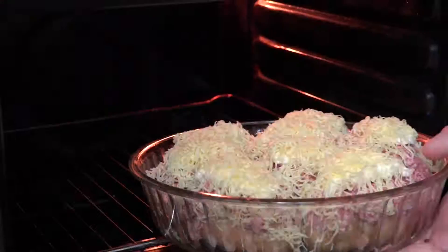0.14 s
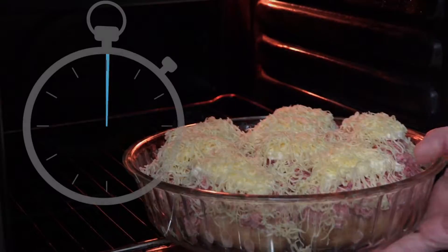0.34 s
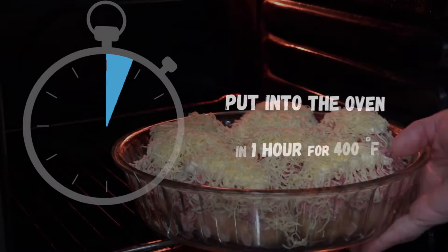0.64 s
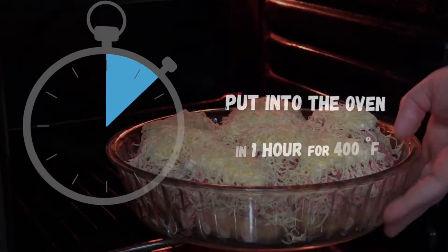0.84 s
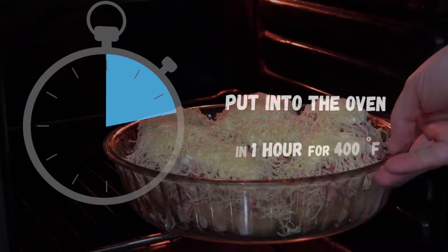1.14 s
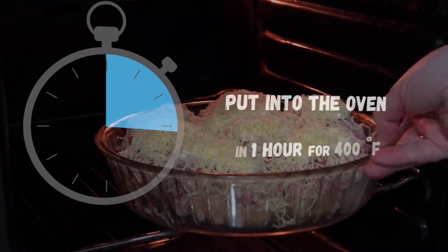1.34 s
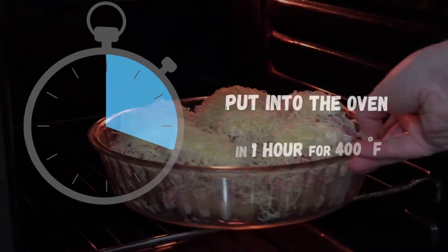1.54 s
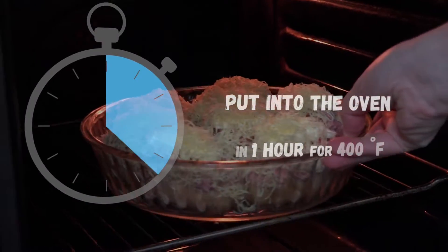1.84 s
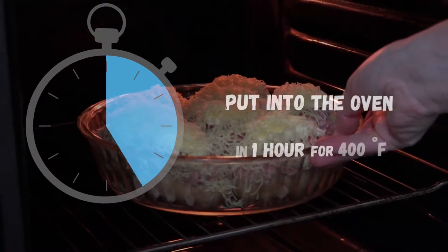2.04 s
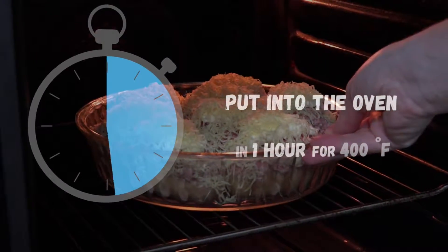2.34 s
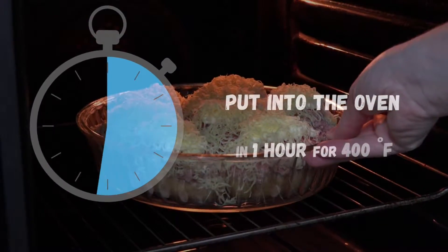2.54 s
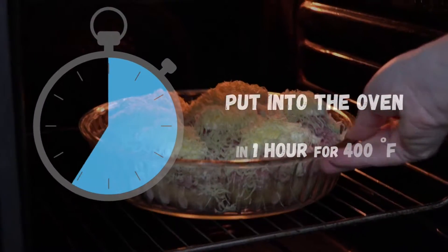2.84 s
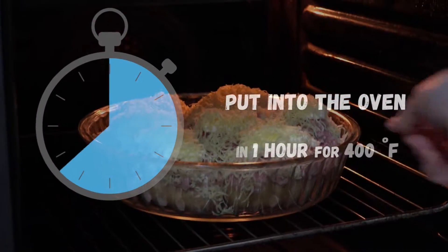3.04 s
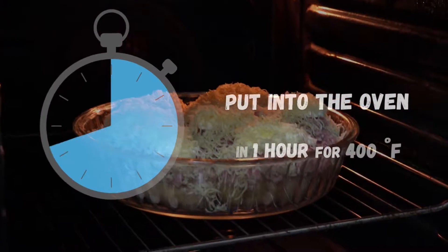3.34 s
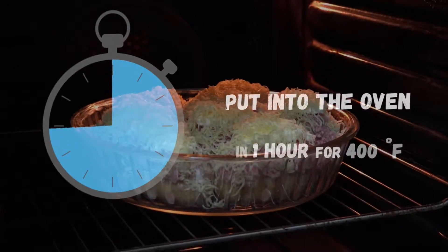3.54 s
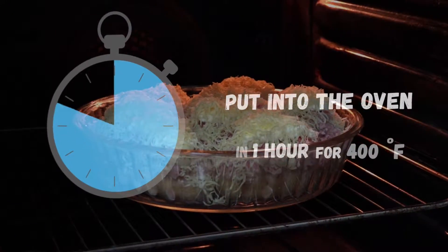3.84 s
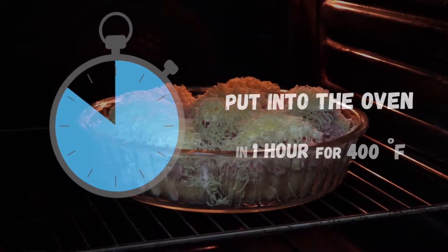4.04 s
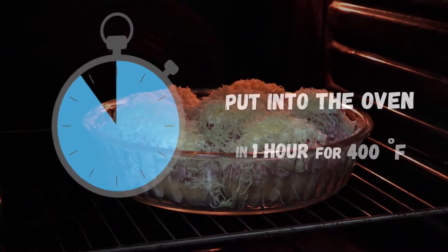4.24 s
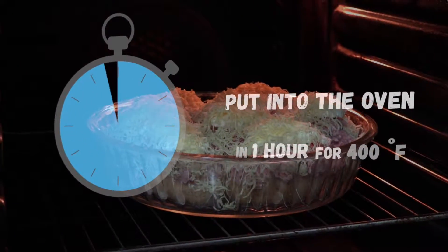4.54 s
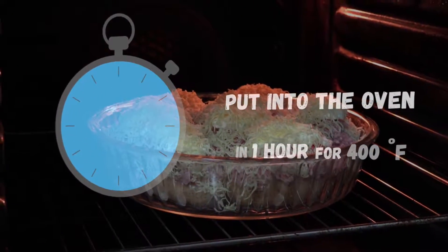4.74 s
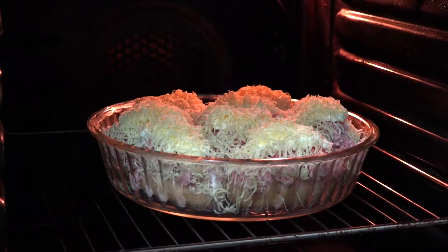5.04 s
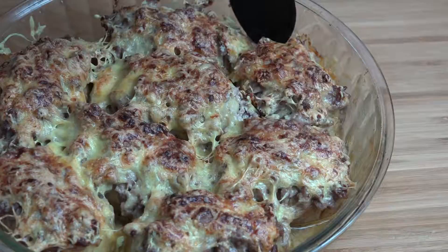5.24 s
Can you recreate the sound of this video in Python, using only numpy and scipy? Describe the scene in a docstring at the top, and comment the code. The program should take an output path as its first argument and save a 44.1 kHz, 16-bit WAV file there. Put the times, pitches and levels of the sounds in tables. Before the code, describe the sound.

Close to an open electric oven in a kitchen, a strong low hum runs with a rushing fan and a thin metallic buzz. A glass dish scrapes over the wire rack in three strokes, catching with brief rough squeaks. Once it settles, the rack gives a few small ticks. The hum grows slightly louder, and air from the door adds a deep rumble on the microphone.

```python
"""Glass dish into a running oven

An open electric oven, close up: its iron core hums strongly, a fan blows through the steel cavity,
loose sheet metal buzzes thinly and air from the door rocks the microphone. A glass dish scrapes
over the wire rack in three strokes and is let go; the rack ticks. The sound cuts in and out abruptly."""
import sys
import numpy as np
from scipy import signal
from scipy.fft import rfft, irfft, next_fast_len
from scipy.io import wavfile
from scipy.ndimage import uniform_filter1d, map_coordinates

SR = 44100
rng = np.random.default_rng(int(sys.argv[2]) if len(sys.argv) > 2 else 0)


def output_pcm(signal):
    """Save a mono or channel-first signal as 16-bit PCM at the path in sys.argv[1].

    Samples are clipped to [-1, 1] before scaling.
    """
    pcm = np.clip(np.atleast_2d(signal).T, -1, 1) * 32767
    wavfile.write(sys.argv[1], SR, np.round(pcm).astype(np.int16))


N = 237376
T = np.arange(N) / SR
MAINS_HZ = 50.0

# core hum, partials 1 to 3: t/s, level/dB
HUM_FIRST = [(0.25, -22.5), (0.68, -21), (1.12, -17.5), (1.97, -18.5), (2.88, -14.5), (3.41, -16.5),
             (4.91, -14.5), (5.2, -13.5)]
HUM_SECOND = [(.25, -32), (.7, -31), (1.5, -29.5), (1.85, -38.5), (2.2, -33.5), (4.5, -34), (5.1, -31.5)]
HUM_THIRD = [(.25, -36.5), (1.1, -33), (2.3, -43), (2.65, -35), (3.15, -41), (3.95, -42.5), (4.45, -31),
             (4.73, -41.5), (5.05, -32.5)]
# shaft tones: multiple of shaft rate, level/dB, unsteady share, flutter rate/Hz
SHAFT_TONES = [(5, -41, 0, 5.1), (6, -39, 0.48, 2.9), (7, -40.5, 0.2, 4.8), (9, -51, 0, 2.1),
               (10, -46.5, 1, 6.6), (16, -47.5, 0.1, 4.2), (17, -43.5, 0.8, 5.3), (18, -42, 1, 6),
               (24, -32.5, 0.54, 9), (30, -33.5, 1, 16)]
# dip in the shaft tones: t/s, half length/s, gain/dB
SHAFT_DIP = [(3.5, 0.29, -2.5)]

def motor(third_trim_db=-1, waver_db=1.5, drift_rad=0.079):
    """The iron core hums at twice the mains rate; the shaft, at half of it, adds fluttering tones."""
    shaft_phase = np.pi * MAINS_HZ * T
    core_phase = 4 * shaft_phase + drift_rad * wobble(0.74)
    partials_db = (curves(HUM_FIRST)[0],
                   curves(HUM_SECOND)[0] + waver_db * wobble(2.8),
                   curves(HUM_THIRD)[0] + third_trim_db)
    out = sum(amp(db) * np.sin(k * core_phase + 2 * np.pi * rng.random())
              for k, db in enumerate(partials_db, 1))
    dip_db = surges(SHAFT_DIP)
    for multiple, db, unsteady, flutter_hz in SHAFT_TONES:
        flutter = unit(wobble(flutter_hz) + 1j * wobble(flutter_hz))
        swing = np.sqrt(1 - unsteady ** 2) + unsteady * flutter
        tone = np.exp(1j * (multiple * shaft_phase + 2 * np.pi * rng.random()))
        out += amp(db + dip_db) * np.real(swing * tone)
    return np.sqrt(2) * out


# push, shove, settle, finger brush: start/s, peak/s, end/s, level/dB, rise/(dB/s), fall/(dB/s)
DISH_STROKES = [(.17, .4, 0.95, -25.5, 31, 17.5), (1.19, 1.635, 1.91, -20, 38.5, 64),
                (1.86, 1.92, 2.42, -23.5, 49, 42.5), (3.11, 3.35, 3.44, -52.5, 23, 128)]
# friction spectra: f/Hz, relative level/dB
PUSH_SPECTRUM = [(700, -15), (1300, 1.5), (1650, -8), (2500, -2.5), (3300, -6), (4400, -9.5), (5200, -11),
                 (6500, -11.5), (7200, -16.5), (8800, -14), (10200, -25.5), (14000, -28), (15800, -38.5)]
SHOVE_SPECTRUM = [(710, -29), (1200, 0.5), (1320, -6.5), (1890, -5.5), (2290, -5.5), (4620, -11),
                  (5990, -12.5), (8920, -16), (10700, -27), (14000, -26), (15800, -38)]
SETTLE_SPECTRUM = [(700, -12.5), (1350, 5.5), (1750, -8), (2900, 0), (5000, -0.5), (6500, -2.5),
                   (9200, -2.5), (10200, -11.5), (13500, -13), (15800, -22)]
BRUSH_SPECTRUM = [(1500, -23), (5000, -8.5), (9000, -2), (11000, -9.5), (15500, -9.5)]
# dish and rack modes: f/Hz, width/Hz, relative level/dB
PUSH_MODES = [(1310, 50, 5), (2555, 230, -6.5), (3020, 73, 6), (3870, 48, -25), (4470, 80, -2),
              (5200, 80, -2), (5660, 49, 6), (6100, 50, -6), (6400, 87, -11)]
SHOVE_MODES = [(1390, 31, 5.5), (2996, 35, 5.5), (3600, 120, -8), (3870, 150, -10.5), (4710, 38, 8.5),
               (5400, 60, 3.5), (6940, 40, -4)]
SETTLE_MODES = [(3920, 73, -12), (6200, 80, -6.5), (7200, 90, -11), (8820, 80, 0), (8740, 82, 1)]

def dish():
    """The dish slides in, is shoved further and settles with a brighter scuff; fingers brush off it."""
    push, shove, settle, brush = DISH_STROKES
    return (scrape(push, PUSH_SPECTRUM, PUSH_MODES, ring_db=-4)
            + scrape(shove, SHOVE_SPECTRUM, SHOVE_MODES, ring_db=-3)
            + scrape(settle, SETTLE_SPECTRUM, SETTLE_MODES, ring_db=-11)
            + scrape(brush, BRUSH_SPECTRUM, [], ring_db=0))


def scrape(stroke, spectrum, modes, ring_db):
    """Dense tiny slips, heard directly and through the ringing dish and rack."""
    slips = rng.standard_normal(N) * (rng.random(N) < .3)
    rub = filtered(slips, lambda f: colour(spectrum)(f) * (1 + amp(ring_db) * resonances(modes)(f)))
    return pressure(*stroke) * unit(rub + wall_echo(rub))


# dish riding over a wire: t/s, half length/s, gain/dB
WIRE_JOLTS = [(.665, 0.055, 5.5), (.82, 0.017, 3.5), (1.29, .02, 5.5), (1.36, .01, 5), (1.91, .02, 4.5),
              (2.055, .025, 3.5), (2.213, 0.018, 5.5)]

def pressure(start_s, peak_s, end_s, peak_db, rise_db_per_s, fall_db_per_s,
             grip_s=0.059, release_s=0.089, grit_db=0.5):
    """Gain of one stroke: it grips, swells, eases off and lets go, jolting over the wires."""
    contact = np.clip(np.minimum((T - start_s) / grip_s, (end_s - T) / release_s), 0, 1)
    below_peak_db = np.maximum(rise_db_per_s * (peak_s - T), fall_db_per_s * (T - peak_s))
    return contact * amp(peak_db - below_peak_db + surges(WIRE_JOLTS) + grit_db * wobble(70))


def wall_echo(x, t60_s=.08):
    """The steel walls return a short dense echo that shifts between two tails in a 1 s cycle."""
    t = np.arange(SR // 8) / SR
    echo = 0
    for phase in (0, np.pi / 2):
        tail = rng.standard_normal(len(t)) * amp(-60 * t / t60_s)
        feed = x * np.cos(2 * np.pi * T + phase)
        echo += signal.fftconvolve(feed, tail / np.linalg.norm(tail))[:N]
    return echo


# glass catching on a wire: t/s, half length/s, f/Hz, width/Hz, level/dB
WIRE_CATCHES = [(0.354, 0.038, 2470, 400, -28), (0.407, 0.038, 2850, 300, -27.5),
                (0.67, 0.064, 2900, 170, -28.5), (1.435, 0.054, 3060, 220, -34),
                (1.548, 0.022, 4980, 500, -26.5), (1.624, .04, 4600, 110, -31.5),
                (1.616, 0.07, 3630, 1100, -25.5), (1.689, .04, 2314, 120, -27.5)]

def squeaks():
    """A wire rings briefly and roughly wherever the glass catches on it."""
    return sum(amp(db) * swell(at_s, half_s) * noise_band(hz, width_hz)
               for at_s, half_s, hz, width_hz, db in WIRE_CATCHES)


def rack_flex(level_db=-29):
    """The rack flexes with a dull rumble under the settling dish."""
    return amp(level_db) * swell(at_s=1.94, half_s=0.049) * noise_band(hz=135, width_hz=35)


# rack ticks: t/s, relative peak level/dB, strongest f/Hz
RACK_TICKS = [(2.8118, -20.5, 6700), (2.8473, -23.5, 6900), (3.033, -33, 8500), (3.057, -34, 6500),
              (3.879, -21, 8800)]
# rack wire modes: f/Hz, relative level/dB, t60/s
WIRE_MODES = [(5320, 1.5, .014), (5970, -5, 0.024), (6570, -1, 0.011), (7200, -5, .01), (8500, -7, .01),
              (9300, -1.5, 0.0079), (10460, -9.5, 0.0089)]

def rack_ticks(gain_db=0.5, crack_gain=0.69, crack_t60_s=0.0059, attack_s=0.00027, focus_db_per_oct=11):
    """Each tick rings a wire, most strongly around a pitch set by the point of contact."""
    out = np.zeros(N + SR)
    t = np.arange(SR // 10) / SR
    for at_s, peak_db, strongest_hz in RACK_TICKS:
        ring = 0
        for hz, db, t60_s in WIRE_MODES:
            mode_db = db - focus_db_per_oct * abs(np.log2(hz / strongest_hz))
            ring += amp(mode_db - 60 * t / t60_s) * np.sin(2 * np.pi * (hz * t + rng.random()))
        crack = crack_gain * amp(-60 * t / crack_t60_s) * rng.standard_normal(len(t))
        tick = (ring + crack) * (1 - np.exp(-t / attack_s))
        out[round(at_s * SR):][:len(t)] += amp(peak_db + gain_db) * tick / np.abs(tick).max()
    return out[:N]


# fan airflow: t/s, rush level/dB, relative whistle level/dB
AIRFLOW = [(.2, -26, -41), (1.2, -25.5, -33), (2.3, -26, -38.5), (3, -26.5, -28.5), (3.8, -27, -26),
           (4.5, -26, -27.5), (5.2, -25, -26)]
# rushing air: f/Hz, relative level/dB
RUSH_SPECTRUM = [(60, -7), (130, -6.5), (195, -0.5), (240, -7.5), (350, -8), (450, -3), (800, -2),
                 (1200, -2.5), (1500, -7.5), (2800, -18.5), (3900, -22), (6400, -31), (7300, -37),
                 (9200, -37.5), (10200, -46.5), (14000, -44.5), (15500, -53)]
# oven cavity modes: f/Hz, width/Hz, relative level/dB
CAVITY_MODES = [(514.6, 30, 2.5), (597, 43, -9.5), (717, 33, 1.5), (902.6, 25, 1), (1740, 46, -17.5),
                (2314, 45, -17.5), (2490, 16, -9), (3280, 78, -19)]

def fan(cavity_db=-5, whistle_db=-3, flicker_db=0.11):
    """Rushing air excites the cavity and half whistles at the vent."""
    flow_db, vent_db = curves(AIRFLOW)
    rush = amp(flow_db + flicker_db * wobble(16)) * noise(colour(RUSH_SPECTRUM))
    passband = colour([(250, -20), (480, 0), (3300, 0), (6000, -20)])
    cavity = amp(flow_db + cavity_db) * noise(lambda f: resonances(CAVITY_MODES)(f) * passband(f))
    whistle = amp(vent_db + whistle_db) * noise_band(hz=1100, width_hz=230)
    return rush + cavity + whistle


# buzz strength: t/s, relative level/dB, top mode gain/dB
BUZZ_LEVELS = [(.2, -12, -3.5), (.9, -3, 3.5), (2.3, 4.5, -6), (2.9, 6, -9), (3.15, 0.5, 3),
               (3.7, 2.5, 5.5), (4.0, 3.5, -9.5), (4.5, 5.5, -3.5), (5.2, 5, 1.5)]
# sheet metal modes: f/Hz, width/Hz, relative level/dB
SHEET_MODES = [(3196, 55, 5.5), (3400, 80, 4.5), (3873, 41, 8.5), (11900, 105, -5.5), (12500, 170, -12.5),
               (14680, 70, -4)]

def buzz(level_db=-50, return_db=-11, attack_s=.006, jitter_s=1.3e-5):
    """Loose sheet metal chatters in every mains cycle, more weakly on the return swing."""
    def ring(hz, width_hz, t):
        return (1 - np.exp(-t / attack_s)) * np.exp(-np.pi * width_hz * t) * np.sin(2 * np.pi * hz * t)

    strength_db, top_db = curves(BUZZ_LEVELS)
    period_s = 1 / MAINS_HZ
    age_s = (T + jitter_s * wobble(60)) % period_s
    return_age_s = (age_s + period_s / 2) % period_s
    rings = []
    for hz, width_hz, db in SHEET_MODES:
        chatter = ring(hz, width_hz, age_s) + amp(return_db) * ring(hz, width_hz, return_age_s)
        rings.append(amp(db) * unit(chatter))
    return amp(level_db + strength_db) * unit(sum(rings[:-1]) + amp(top_db) * rings[-1])


# gusts from the door: t/s, half length/s, gain/dB
DOOR_GUSTS = [(.7, .2, 2), (1.52, .15, 6), (3.0, 0.66, 8), (4.02, 0.077, 8.5), (4.35, 0.17, 3.5)]

def draught(level_db=-21):
    """Air from the open door rocks the microphone, deeper than the hum and harder in gusts."""
    sway = noise(colour([(4, -12), (11, 8), (17, -23), (26, -1.5), (35, -18.5), (55, -33.5),
                         (90, -59.5), (250, -130)]))
    local_power = np.abs(uniform_filter1d(sway ** 2, SR // 8))
    even_sway = sway / np.sqrt(local_power + .05)
    return amp(level_db + surges(DOOR_GUSTS)) * even_sway


def amp(db):
    """Decibels to gain."""
    return 10 ** (np.asarray(db) / 20)


def unit(x):
    """Scaled to rms 1."""
    return x / np.sqrt(np.mean(np.abs(x) ** 2) + 1e-20)


def curves(rows):
    """One value per sample for each column after the time."""
    times_s, *columns = np.transpose(rows)
    return [np.interp(T, times_s, column) for column in columns]


def wobble(rate_hz):
    """Smooth random curve of rms 1, with knots at rate_hz."""
    return unit(map_coordinates(rng.standard_normal(400), [T * rate_hz], mode="wrap"))


def swell(at_s, half_s):
    """Bell curve of height 1."""
    return np.exp(-((T - at_s) / half_s) ** 2)


def surges(rows):
    """Summed bell curves, in dB."""
    return sum(db * swell(at_s, half_s) for at_s, half_s, db in rows)


def filtered(x, response):
    """x through a complex frequency response."""
    size = next_fast_len(N + SR // 2)
    return irfft(rfft(x, size) * response(np.fft.rfftfreq(size, 1 / SR)), size)[:N]


def colour(points):
    """Response through (f/Hz, level/dB) points on a log axis."""
    hz, db = np.transpose(points)
    return lambda f: amp(np.interp(np.log(f + 1), np.log(hz + 1), db))


def resonances(modes):
    """Causal response of a set of modes."""
    return lambda f: sum(amp(db) * 1j * f * width_hz / (hz * hz - f * f + 1j * f * width_hz)
                         for hz, width_hz, db in modes)


def noise(response):
    """Filtered noise of rms 1."""
    return unit(filtered(rng.standard_normal(N), response))


def noise_band(hz, width_hz):
    """Noise passed twice through one resonance."""
    return noise(lambda f: resonances([(hz, width_hz, 0)])(f) ** 2)


def scene():
    """Oven, dish and rack at one microphone."""
    oven = motor() + fan() + draught() + buzz()
    return (oven + dish() + squeaks() + rack_flex() + rack_ticks())[None]


def record(dry, on_s=.195, off_s=5.236, ramp_s=.002, cutoff_hz=15800):
    """Abrupt start and stop, then the band limit."""
    gate = np.clip(np.minimum(T - on_s, off_s - T) / ramp_s + .5, 0, 1)
    return filtered(dry[0] * gate, lambda f: f < cutoff_hz)[None]


dry = scene()
out = record(dry)
output_pcm(out)
```